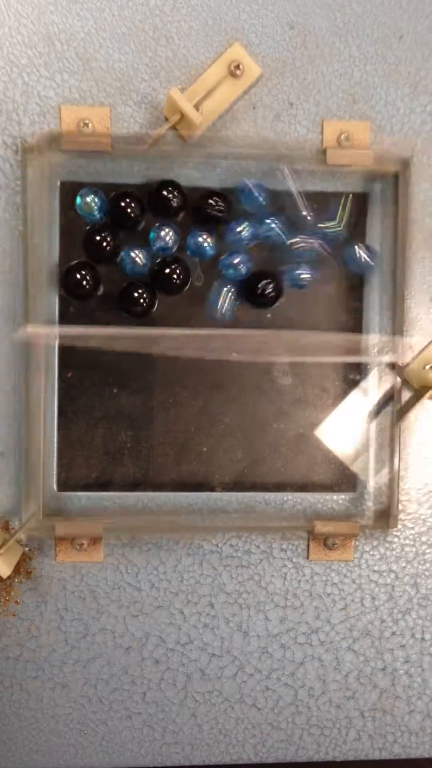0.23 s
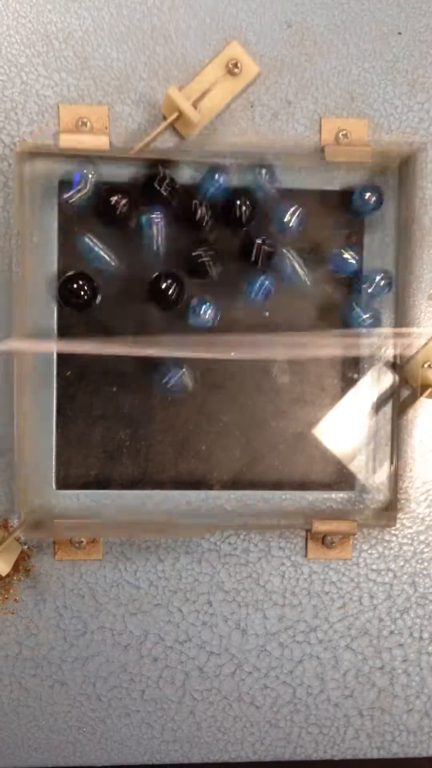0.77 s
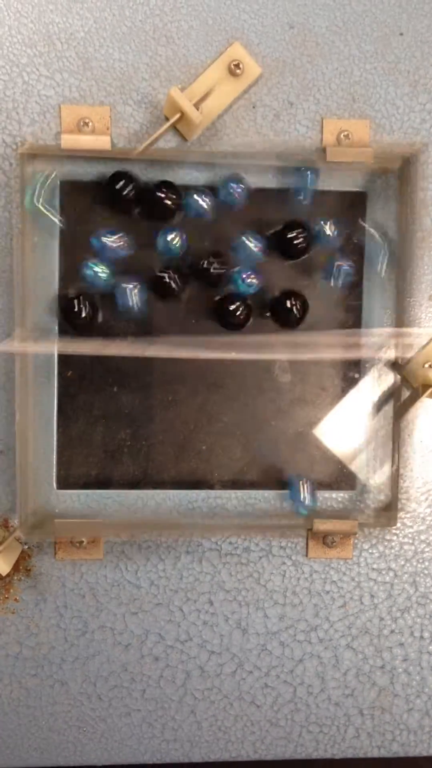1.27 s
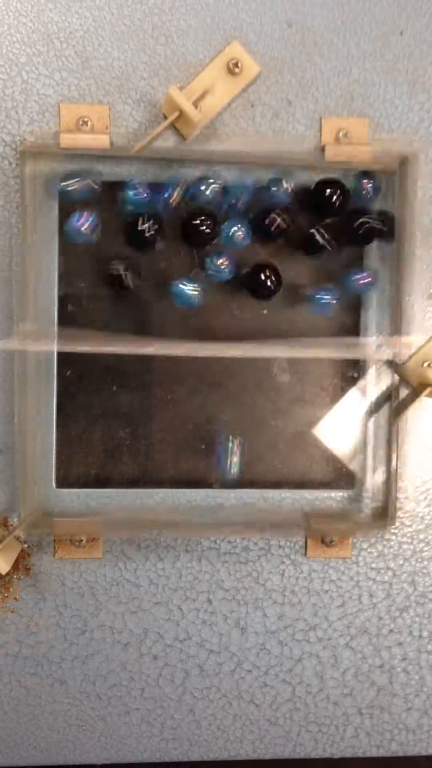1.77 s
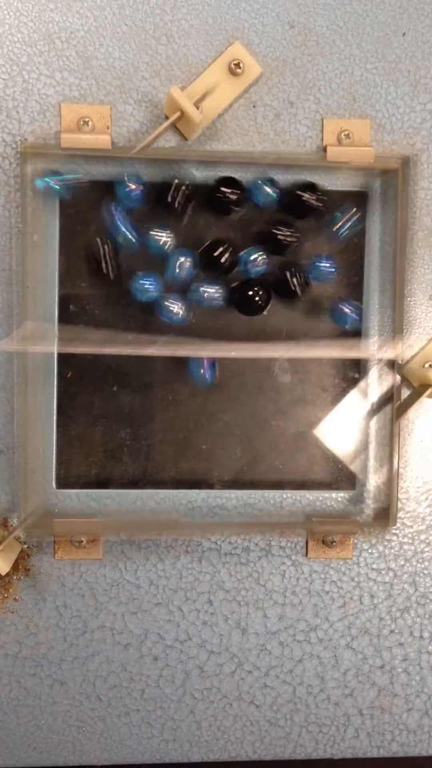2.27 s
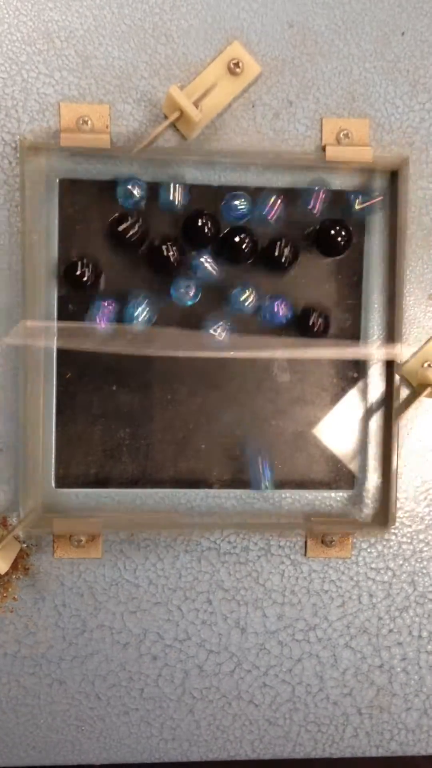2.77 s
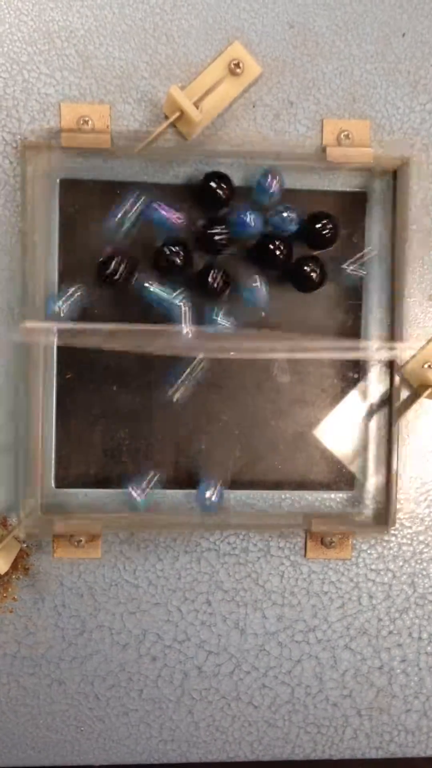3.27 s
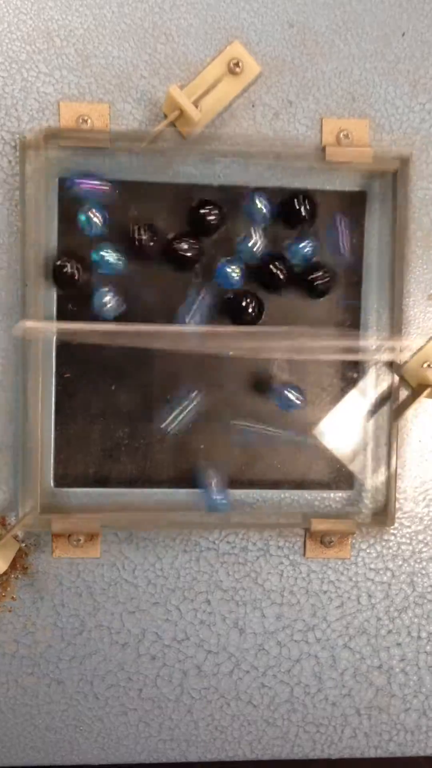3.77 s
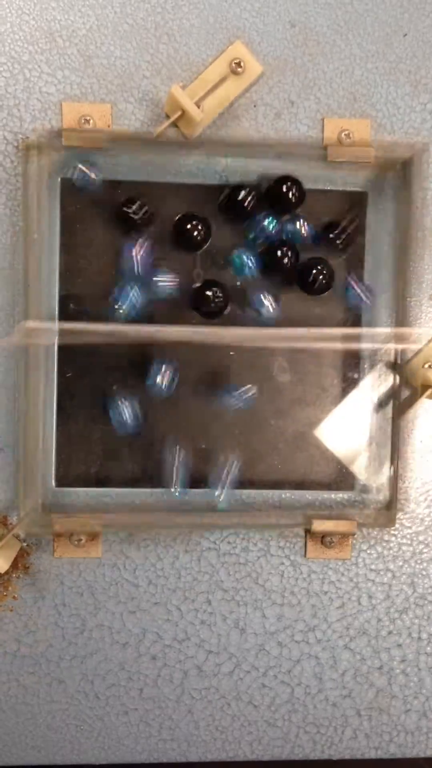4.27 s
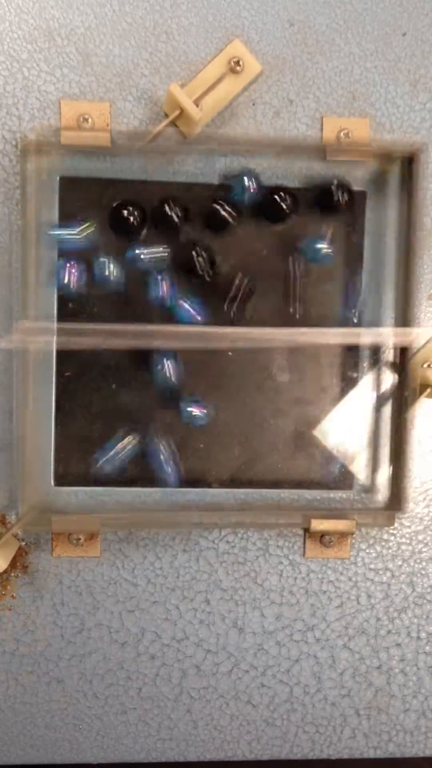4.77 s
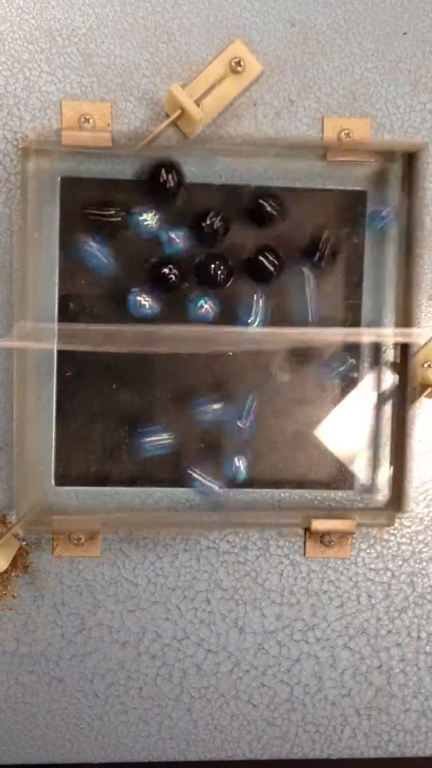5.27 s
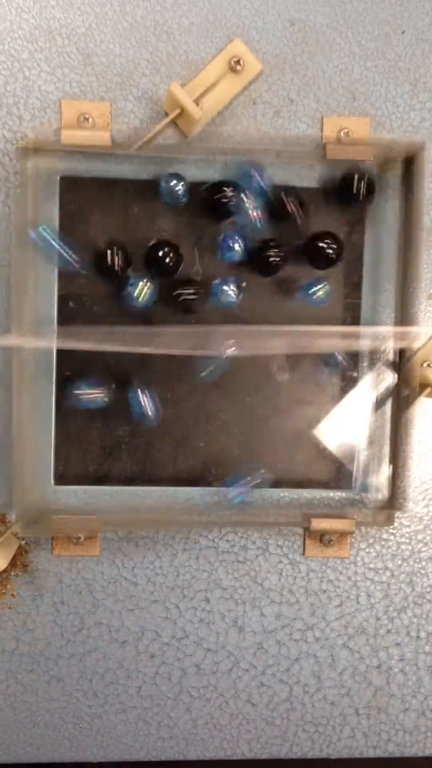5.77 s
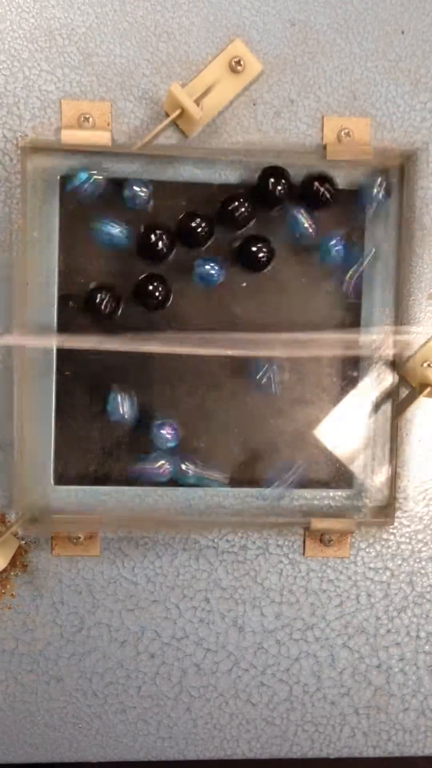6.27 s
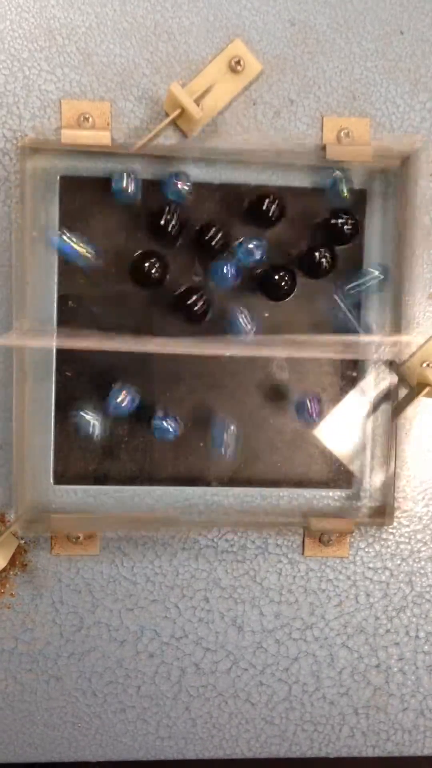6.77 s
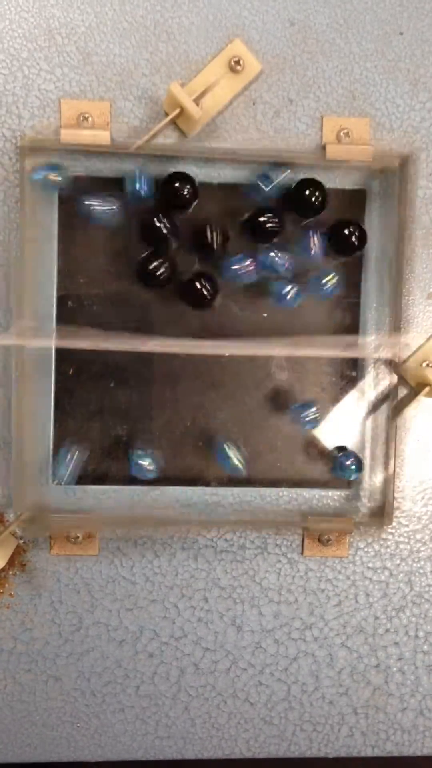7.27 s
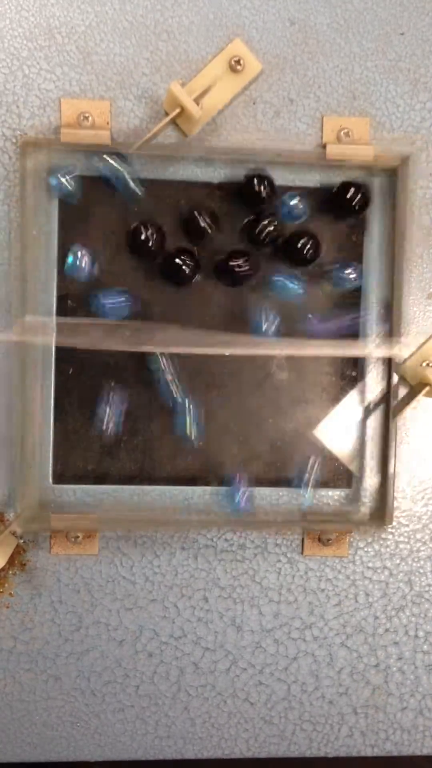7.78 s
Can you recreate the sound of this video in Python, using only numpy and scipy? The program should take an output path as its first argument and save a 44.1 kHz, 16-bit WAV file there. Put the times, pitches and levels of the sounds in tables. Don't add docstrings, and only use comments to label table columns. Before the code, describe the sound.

A loud, dense glassy rattle starts at once and never stops, a rapid mechanical flutter of beads thrown against frame and plate. Harder clacks jump out unevenly, fine sparkling ticks fill the gaps, and the thin divider sometimes rings very high. After half a second a small motor's thin steady whine fades in over the muffled drive rumble. Heard close, with a short room echo and a slightly squashed phone sound.

```python
import sys
import numpy as np
from scipy import signal
from scipy.fft import rfft, irfft
from scipy.io import wavfile
from scipy.ndimage import uniform_filter1d

SR = 44100
rng = np.random.default_rng(int(sys.argv[2]) if len(sys.argv) > 2 else 0)


def makeup_ratio(level_db):
    decades = np.asarray(level_db, float) / 20
    return 10 ** decades


def unload_wav(signal):
    wavfile.write(
        sys.argv[1],
        SR,
        np.round(np.clip(np.atleast_2d(signal).T, -1, 1) * 32767).astype(np.int16),
    )


N = 353682


def in_time(rows):
    s, *columns = np.transpose(rows)
    return [np.interp(np.arange(N) / SR, s, c) for c in columns]


def rms_one(x):
    return x / np.sqrt(np.mean(x ** 2) + 1e-20)


def resonate(x, hz, width_hz):
    r = np.exp(-np.pi * abs(width_hz) / SR)
    poles = [1, -2 * r * np.cos(2 * np.pi * hz / SR), r * r]
    return signal.lfilter((1 - r * r) / 2 * np.array([1, 0, -1]), poles, x + 1e-18)


def colour(x, spectrum):
    hz, level_db = np.transpose(spectrum)
    grid_hz = np.arange(1025) * SR / 2048 + 1
    log_hz = np.log([hz[0] / 4, *hz])
    gain_db = np.interp(np.log(grid_hz), log_hz, [level_db[0] - 36, *level_db])
    cepstrum = irfft(np.log(makeup_ratio(gain_db)))
    cepstrum[1:1024] *= 2
    cepstrum[1025:] = 0
    return signal.oaconvolve(x, irfft(np.exp(rfft(cepstrum))))[:N]


def contacts(per_s, spread_db):
    born = rng.random(N) < per_s / SR
    hardness = makeup_ratio(spread_db * np.minimum(rng.exponential(1, N), 3))
    return rms_one(born * hardness * rng.choice([-1, 1], N))


def bursts(times, level_db, rise_s, fall_s):
    marks = np.zeros(N)
    marks[np.minimum((np.asarray(times) * SR).astype(int), N - 1)] = makeup_ratio(level_db)
    t = np.arange(4000) / SR
    shape = np.exp(-t / fall_s) * (1 - np.exp(-t / rise_s))
    return signal.oaconvolve(marks, shape / shape.max())[:N]


def room(x, count=6):
    t60_s = 0.41
    t = np.arange(SR // 2) / SR
    echoes = rng.standard_normal((count, len(t))) * makeup_ratio(-60 * t / t60_s) * (t > .004)
    path = rng.integers(0, count, N // 512 + 1)
    place = uniform_filter1d(np.repeat(np.eye(count)[:, path], 512, axis=1), size=256)
    return sum(signal.oaconvolve(x * p[:N], e / np.sqrt(np.sum(e ** 2)))[:N] for p, e in zip(place, echoes))


# time_s, pitch_hz
MOTOR_PITCH = [
    (.5, 338),
    (.75, 348.5),
    (1, 353.5),
    (1.5, 354.5),
    (2.5, 355.5),
    (3.5, 358),
    (4.5, 359),
    (8.02, 359.5),
]


def whine():
    phase = 2 * np.pi * np.cumsum(in_time(MOTOR_PITCH)[0]) / SR
    running = np.clip((np.arange(N) / SR - MOTOR_PITCH[0][0]) / 0.26, 0, 1)
    partials = makeup_ratio(-59) * np.sin(phase) + makeup_ratio(-37) * np.sin(3 * phase)
    return np.sqrt(2) * running * partials


# time_s, lag_turns
DRIVE_LAG = [(0.0, -0.09), (0.75, -0.044), (1.5, -0.0027), (2.1, 0.068), (3.2, 0.037), (4.0, -0.024),
             (5.0, -0.089), (5.5, 0.008), (6.2, -0.031), (7.0, -0.082), (8.0, 0.07)]


def turns():
    shake_hz = 14.17
    return shake_hz * np.arange(N) / SR - in_time(DRIVE_LAG)[0]


# phase_turns, level_db
KICK = [
    (0.036, -19),
    (0.107, -2.5),
    (0.2, -6),
    (0.33, -0.5),
    (0.55, -7.5),
    (0.679, 5.5),
    (0.75, -6.5),
    (0.821, -1.5),
    (0.92, -14.5),
]


def throw(depth):
    return makeup_ratio(depth * np.interp(turns(), *np.transpose(KICK), period=1))


# pitch_hz, level_db (per Hz)
TABLE_RUMBLE = [(110, -14), (150, -2.5), (212, -10.5), (226, 11), (255, 8.5), (320, 2.5), (385, 0),
                (440, 6.5), (520, 14.5), (600, 7), (700, -16), (800, -7.5)]


def drive():
    rolling = rng.standard_normal(N) * throw(depth=0.71)
    return makeup_ratio(-39.5) * rms_one(colour(rolling, TABLE_RUMBLE))


DIVIDER_PITCH = [11775, 12052, 12217, 12490]
# width_hz, clean_strike_db, stray_tick_db
DIVIDER_MODES = [
    (10.9, -2, -15.5),
    (55, -0.5, -6),
    (26, -10, -20),
    (16, -19, -22),
]
# start_s, peak_db
LONG_STRIKES = [(0.5062, -33), (0.5994, -36), (1.3538, -24), (1.6412, -20), (1.8602, -29), (2.1041, -27),
                (2.6364, -22), (3.6107, -19), (3.9809, -36), (4.3131, -19), (4.6079, -26), (4.7092, -18),
                (4.8494, -19), (5.0898, -18), (5.3294, -22), (5.5952, -27), (5.905, -19), (6.2158, -17),
                (6.5784, -27), (6.795, -22), (7.0618, -18), (7.418, -30), (7.7194, -20), (7.8101, -20)]
# start_s, peak_db
SHORT_STRIKES = [(0.5861, -17), (0.7213, -16), (0.8265, -15), (0.9537, -15), (1.0405, -17), (1.0844, -15),
                 (1.7574, -13), (1.8223, -15), (2.151, -14), (2.6364, -14), (2.9527, -15), (3.2007, -14),
                 (3.276, -15), (3.9103, -14), (4.188, -25), (4.6084, -24), (4.9482, -16), (5.2684, -18),
                 (5.905, -32), (6.0811, -17), (6.2163, -18), (6.463, -20), (6.5789, -22), (6.8209, -17),
                 (6.9536, -19), (7.3023, -26), (7.7194, -20), (7.8088, -25)]


def divider(ticks):
    out = 0
    for k, (hz, (width_hz, strike_db, stray_db)) in enumerate(zip(DIVIDER_PITCH, DIVIDER_MODES)):
        s, peak_db = np.transpose(SHORT_STRIKES if k else LONG_STRIKES)
        uneven_db = 3.0 * rng.standard_normal(len(s)) * (k > 0)
        strikes = np.zeros(N)
        strikes[(s * SR).astype(int)] = makeup_ratio(peak_db + strike_db + uneven_db)
        stray = makeup_ratio(stray_db - 29.5) * ticks * makeup_ratio(6.9 * rng.standard_normal(N))
        unit_ring = SR / (2 * np.pi * width_hz)
        out = out + resonate(strikes + stray, hz, width_hz) * unit_ring
    return out


# pitch_hz, level_db (per Hz)
SNAP = [(3000, 2), (4500, 0.5), (6500, -1), (8500, -0.5), (10900, -5), (11900, -7.5), (12500, -11),
        (13150, -10), (13400, 0), (13600, 0.5), (14300, -5), (14900, -8), (15300, 4)]


def glass(ticks, cycles, ring_db, patch_db):
    pitches_hz = np.geomspace(3500, 14500, 32)
    dealt = rng.integers(0, 32, N)
    hard = makeup_ratio(patch_db * rng.standard_normal(N))
    rings = sum(resonate(ticks * hard * (dealt == k), hz, hz / cycles) for k, hz in enumerate(pitches_hz))
    return colour(ticks + makeup_ratio(ring_db) * rings, SNAP)


FRAME_PITCH = [790, 850, 975, 1340, 1470, 1795, 2090, 2140, 2530, 3060, 3190, 3930, 4300, 5435, 6020, 7310,
               9430, 10630]
# width_hz, level_db
FRAME_MODES = [(72.4, 3), (70, 2), (84, -10), (149, 0), (78, -36), (138, -4.5), (55, 2.5), (69, -1.5),
               (110, -11.5), (74.5, -4.5), (66.4, -6.5), (247, -11.5), (150, -10.5), (100, -8), (120, -45),
               (90, -8), (200, -22), (50, -21)]
# pitch_hz, level_db (per Hz)
CONTACT_THUD = [(640, -24.5), (760, -2.5), (1500, -2.5), (2150, -19), (2330, -17), (2800, -17.5),
                (3420, -19), (3700, -9), (5000, -32.5)]


def frame(force, thud_db, spot_db, cluster_db):
    count = N + 997 * len(FRAME_MODES)
    places = uniform_filter1d(np.repeat(rng.standard_normal(N // 700 + 40), 700), size=200)
    spots = makeup_ratio(spot_db * rng.standard_normal(count) + cluster_db * places[:count])
    modes = 0
    for k, (hz, (width_hz, level_db)) in enumerate(zip(FRAME_PITCH, FRAME_MODES)):
        fed = force * spots[997 * k:][:N]
        modes = modes + makeup_ratio(level_db) * (-1) ** k * resonate(fed, hz, width_hz)
    sound = modes + makeup_ratio(thud_db) * colour(force, CONTACT_THUD)
    no_bass = signal.butter(2, 640, "high", fs=SR, output="sos")
    return signal.sosfilt(no_bass, sound)


# phase_turns, chance (0-1), peak_db (over the crowd)
WALL_SWEEPS = [
    (0.1, .5, 5),
    (0.338, 0.8, 10),
    (0.632, .95, 8.5),
    (0.899, .5, 6),
]
# start_s, peak_db, brightness_db
PILE_UPS = [(0.013, 1, -37), (0.041, -1, -37), (0.112, 0, -32), (0.184, -4.5, -49), (0.326, -3, -26),
            (0.474, -1, -22), (0.534, 0.5, -27), (0.743, 1, -48), (1.408, -2, -28), (2.005, -4.5, -15),
            (2.044, -2.5, -32), (2.187, -2, -24), (2.359, 1, -16), (2.449, 1.5, -25), (2.568, -2, -23),
            (2.82, 1.5, -36), (2.987, -4, -42), (3.344, -0.5, -27), (4.259, -2.5, -23), (4.565, -1.5, -24),
            (4.61, 1, -24), (5.055, -5, -15), (5.532, -2, -35), (6.132, 4, -36), (6.375, 3, -27),
            (6.534, -1.5, -33), (6.728, -4.5, -25), (7.175, 1.5, -19), (7.381, 1, -23), (7.787, -3, -41)]


def sweeps(crowd_db):
    phase, chance, over_db = np.transpose(WALL_SWEEPS)
    made = turns()
    whole = int(made[-1])
    luck = rng.random((whole, 4))
    jitter, spread, shine = rng.standard_normal((3, whole, 4))
    due = np.arange(whole)[:, None] + phase + 0.0307 * np.clip(jitter, -2, 2)
    at = np.interp(due, made, np.arange(N)).astype(int)
    peak_db = crowd_db[at] + over_db + 1.5 * np.minimum(spread, 1)
    bright_db = -18.5 + 3 * np.minimum(shine, 1)
    rows = np.stack([at / SR, peak_db, bright_db], axis=-1)[luck < chance]
    apart = np.abs(rows[:, :1] - np.array(PILE_UPS)[:, 0]).min(axis=1) > .012
    return np.vstack([rows[apart & (rows[:, 0] > .01)], PILE_UPS])


# time_s, level_db
LIVELINESS = [(0.0, -21.5), (0.4, -17), (0.58, -19), (1.07, -17.5), (1.65, -19), (1.95, -17), (2.19, -20.5),
              (2.93, -19), (3.19, -16.5), (3.55, -19.5), (3.82, -17.5), (4.1, -20), (5.0, -17),
              (5.45, -16.5), (5.6, -20), (6.36, -18), (6.77, -18), (8.02, -17.5)]


def beads():
    crowd_db, = in_time(LIVELINESS)
    s, peak_db, bright_db = np.transpose(sweeps(crowd_db))
    low = makeup_ratio(crowd_db + 11.0) * throw(depth=0.37)
    low = low + bursts(s - .003, peak_db - 2.0, rise_s=0.0044, fall_s=0.0045)
    high = makeup_ratio(crowd_db - 5) * throw(depth=0.63)
    high = high + bursts(s - .004, peak_db + bright_db - 2.5, rise_s=0.0076, fall_s=0.013)
    lead = bursts(s + 0.001007, peak_db - 4.5, rise_s=.0001, fall_s=0.000086)
    ticks = high * contacts(per_s=4000, spread_db=4.5)
    force = low * contacts(per_s=2000, spread_db=2.0) + lead
    rattle = frame(force, thud_db=1.0, spot_db=4.5, cluster_db=1.43)
    ticking = glass(ticks + makeup_ratio(-21.5) * force, cycles=72.5, ring_db=16, patch_db=3.0)
    return rattle + ticking + divider(ticks)


def scene():
    tray = beads()
    return (tray + makeup_ratio(-11) * room(tray) + drive() + whine())[None]


def top_cut(x):
    return signal.sosfilt(signal.butter(12, 15900, fs=SR, output="sos"), x)


def record(dry):
    rounded = 0.89 * np.tanh(dry / 0.85)
    thin = signal.sosfilt(signal.butter(4, 150, "high", fs=SR, output="sos"), rounded)
    limited = np.clip(thin, -.68, .68)
    top_hz = 15310
    edged = signal.sosfilt(signal.cheby2(20, 55, top_hz + 200, fs=SR, output="sos"), limited)
    return top_cut(edged)


dry = scene()
out = record(dry)
unload_wav(out)
```